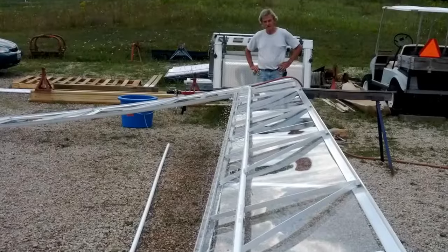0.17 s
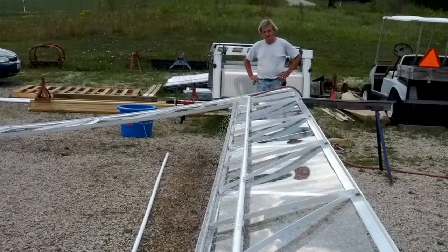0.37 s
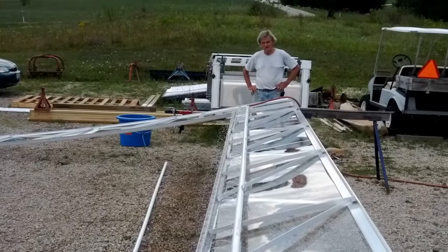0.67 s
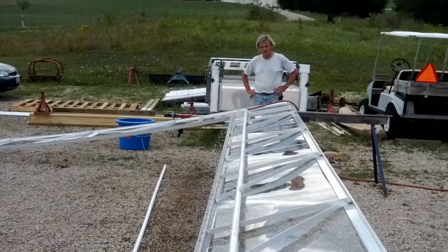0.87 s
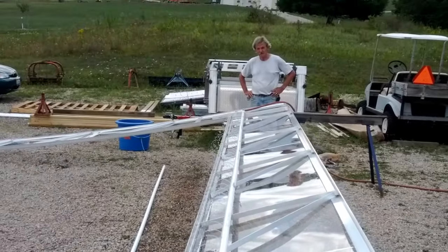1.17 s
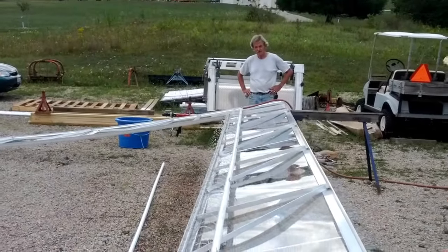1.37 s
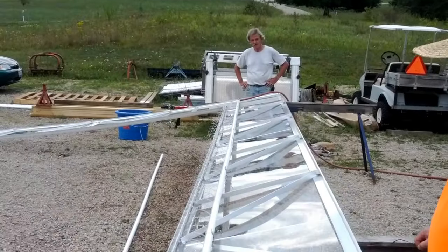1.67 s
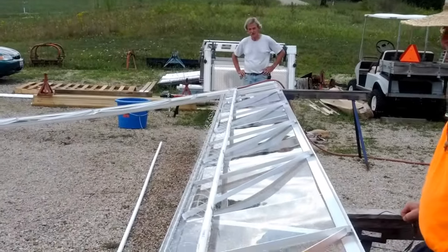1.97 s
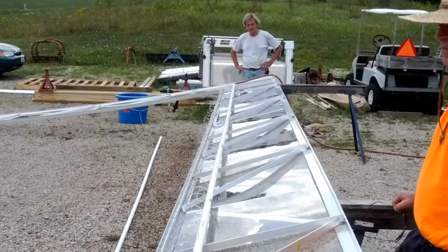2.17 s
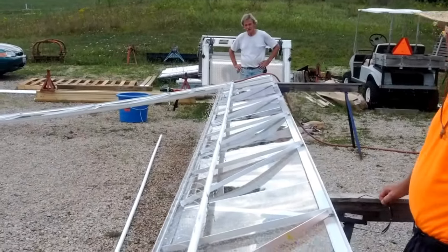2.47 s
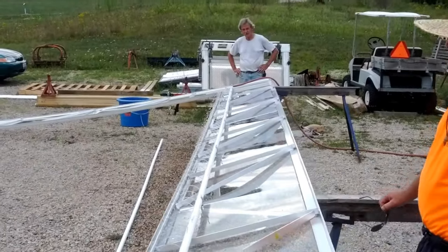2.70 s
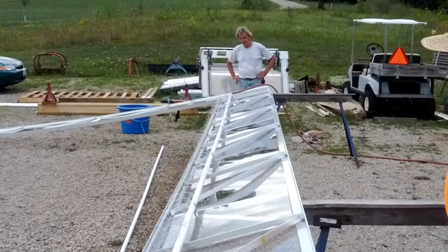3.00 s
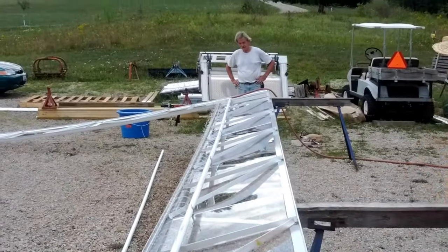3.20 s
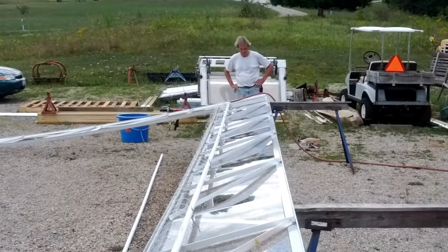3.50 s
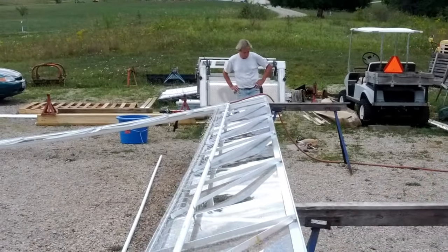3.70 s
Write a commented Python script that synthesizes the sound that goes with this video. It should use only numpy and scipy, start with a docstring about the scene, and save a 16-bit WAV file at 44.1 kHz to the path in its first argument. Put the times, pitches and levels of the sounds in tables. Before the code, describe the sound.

A close, splashy trickle of water runs across plastic sheeting as wind buffets the microphone.

```python
"""Water trickling and spattering close by, as it runs over the plastic film of a roof panel outdoors.
Trapped air rings as short rising bubbles, and drops tick sharply on the film over a fine wash.
The trickle slowly fades while a duller patter fills in beneath it.
Wind buffets the microphone in low thumps and grows to a gust near the end."""
import sys
import numpy as np
from scipy import signal
from scipy.fft import rfft, irfft, next_fast_len
from scipy.io import wavfile
from scipy.ndimage import uniform_filter1d, map_coordinates

SR = 44100
rng = np.random.default_rng(int(sys.argv[2]) if len(sys.argv) > 2 else 0)


def store_wav(level_fs):
    """Save 16-bit WAV to argv[1]."""
    pcm = np.round(np.clip(np.atleast_2d(level_fs), -1, 1) * 32767)
    wavfile.write(sys.argv[1], SR, pcm.T.astype(np.int16))


N = 169785

# Strength of the trickle over the panel. Each row: time in seconds, relative level in dB.
FLOW_DB = [(0, 0), (.9, 0), (1.5, -0.5), (2.1, -1), (2.7, -3), (3.2, -8), (3.85, -4.5)]


def amp(db):
    return 10 ** (np.asarray(db) / 20)


def unit(x):
    return x / np.sqrt(np.mean(x ** 2) + 1e-20)


def curve(rows):
    """One value per sample from (seconds, value) points."""
    return np.interp(np.arange(N) / SR, *np.transpose(rows))


def wobble(per_s):
    """A smooth random curve with per_s knots a second."""
    return map_coordinates(rng.standard_normal(int(N * per_s / SR) + 4), [np.arange(N) * per_s / SR])


def coloured(x, spectrum):
    """x through a causal filter shaped by (Hz, dB) points."""
    m = 2 * next_fast_len(N // 2 + 8192)
    hz, db = np.transpose(spectrum)
    gain_db = np.interp(np.log(np.fft.rfftfreq(m, 1 / SR) + 1), np.log(hz), db)
    cepstrum = irfft(np.log(amp(gain_db)))
    cepstrum[1:m // 2] *= 2  # fold onto positive time for minimum phase
    cepstrum[m // 2 + 1:] = 0
    return irfft(rfft(x, m) * np.exp(rfft(cepstrum)), m)[:N]


def noise(spectrum):
    """Coloured noise of rms 1."""
    return unit(coloured(rng.standard_normal(N), spectrum))


def placed(starts, grains):
    """Sum of the rows of grains, each at its start in seconds."""
    at = np.abs(np.round(starts * SR)).astype(int)[:, None] + np.arange(grains.shape[1])
    return np.bincount(at.ravel(), grains.ravel(), N)[:N]


def shower(per_s, spread_db, clump):
    """Starts in seconds and levels in dB of random events that come in clumps."""
    cumulative = np.cumsum(np.exp(clump * wobble(45)))
    when, strength = rng.random((int(per_s * N / SR), 2)).T
    starts = np.searchsorted(cumulative, when * cumulative[-1]) / SR
    return starts, -spread_db * np.log(strength + 0.0086)


def rings(starts, db, hz, cycles, rise, samples, attack_s=.00028):
    """Sines that die by 60 dB in roughly `cycles`; rise lifts the pitch, as when a bubble surfaces."""
    t = np.arange(samples) / SR
    life = (cycles / hz * np.exp(0.36 * rng.standard_normal(len(hz))))[:, None]
    tone = np.sin(2 * np.pi * hz[:, None] * t * (1 + rise * t / life / 2))
    return placed(starts, tone * amp(db[:, None] - 60 * t / life) * (1 - np.exp(-t / attack_s)))


def splats(starts, db, t60_s, spectrum, samples):
    """Tiny decaying bursts of coloured noise."""
    t = np.arange(samples) / SR
    bursts = rng.standard_normal((len(db), samples)) * amp(db[:, None] - 60 * t / t60_s)
    return coloured(placed(starts, bursts), spectrum)


def glugs(gain_db=.5, start_ratio=.9, rise=.55, attack_s=.0009, churn_hz=260):
    """Each loud bubble opens with a slap and rings as a rising tone, blurred by the splash round it."""
    # The loudest bubbles. Each row: start in seconds, relative level in dB, nominal pitch in Hz,
    # cycles to fall 60 dB, splashiness from 0 to 1.
    loud_bubbles = [(0.1817, -27.5, 1820, 52, 0.3), (0.237, -26, 1840, 44, 0.26),
                    (0.3517, -25, 1670, 50, 0.17), (0.472, -31.5, 1430, 59, 0.2),
                    (0.546, -24, 2540, 32, .7), (0.623, -34, 1370, 52, 0.14), (0.6805, -23, 2040, 65, 0.5),
                    (0.7128, -24.5, 1840, 48, .6), (0.509, -35, 1300, 52, 0.4), (.776, -23.5, 1960, 46, 1),
                    (.985, -29.5, 1920, 54, 0.4), (1.02, -31, 1680, 56, 0.7), (1.227, -34, 1140, 52, 0.3),
                    (1.252, -28, 1300, 60, 0.8), (1.2916, -15, 1330, 15, 0.13),
                    (1.33, -29, 1890, 135, 0.96), (1.5, -29.5, 1490, 57, 0.8),
                    (1.616, -26.5, 2480, 61, 0.3), (1.647, -30.5, 1000, 41, 0), (1.745, -28, 1840, 54, .35),
                    (1.913, -28, 2390, 48, .3), (2.04, -28.5, 1030, 28, 0.1), (2.067, -27, 1090, 16, .4),
                    (2.104, -29, 1073, 41, 0.4), (2.29, -30.5, 1900, 76, 0.8), (2.862, -29, 1240, 23, 0.8),
                    (3.337, -31.5, 1580, 45, 0.3)]
    # Colour of the slap. Each row: frequency in Hz, gain in dB.
    slap_spectrum = [(400, -32), (900, -22), (1900, 2), (2800, -7), (4000, -32), (8000, -6), (16000, -29)]
    starts, db, hz, cycles, splashy = np.transpose(loud_bubbles)[:, :, None]
    t = np.arange(4000) / SR
    life = cycles / hz
    tone = np.exp(2j * np.pi * hz * start_ratio * t * (1 + rise * t / life / 2))
    white = rng.standard_normal((len(starts), len(t), 2)) @ [1, 1j]
    churn = signal.sosfiltfilt(signal.butter(2, churn_hz, fs=SR, output="sos"), white, padtype="even")
    churn = amp(-1.5 - 60 * t / life / 1.2) * churn / churn.std()  # slightly outlasts the clean ring
    envelope = np.sqrt(1 - splashy) * amp(-60 * t / life) + np.sqrt(splashy) * churn
    ringing = amp(db + gain_db) * np.imag(tone * envelope) * (1 - np.exp(-t / attack_s))
    slaps = splats(starts[:, 0], db[:, 0] - 12, t60_s=.012, spectrum=slap_spectrum, samples=1500)
    return placed(starts[:, 0], ringing) + slaps


def ticks(gain_db=7.5, ring_hz=13400, t60_s=.0021, attack_s=.000094):
    """Single drops strike the film with a very short, high ring."""
    # The loudest drops. Each row: start in seconds, relative level in dB.
    loud_drops = [(.228, -12), (.2763, -18), (.4285, -15.5), (0.567, -16), (.8655, -12), (1.0526, -21),
                  (1.556, -22), (1.585, -17), (1.709, -25), (1.734, -12.5), (2.589, -9.5), (3.0157, -17),
                  (3.439, -14.5)]
    starts, db = np.transpose(loud_drops)
    t = np.arange(400) / SR
    hz = ring_hz * np.exp(0.032 * rng.standard_normal((len(starts), 1)))
    envelope = amp(db[:, None] + gain_db - 60 * t / t60_s) * (1 - np.exp(-t / attack_s))
    return placed(starts, envelope * np.sin(2 * np.pi * hz * t))


def splashes(bubbles_each=7, span_s=.012):
    """A lump of water breaks up into a tight burst of small bubbles."""
    # Each row: start in seconds, relative level in dB, middle pitch in Hz.
    bursts = [(.205, -29, 3600), (.413, -27, 3770), (.46, -20.5, 4770), (.646, -28, 4100),
              (.945, -37, 5900), (1.326, -22, 7140), (1.744, -23.5, 5550)]
    starts, db, middle_hz = np.repeat(bursts, bubbles_each, axis=0).T
    late, soft = rng.random((2, len(starts)))
    hz = middle_hz * np.exp(0.184 * rng.standard_normal(len(starts)))
    return rings(starts + span_s * late, db - 4 * late - 6 * soft, hz, cycles=26.5, rise=.033, samples=1200)


def spatter(level_db=-40, ring_hz=13380):
    """Dense droplets, each ringing the film briefly at its own high pitch."""
    starts, db = shower(per_s=900, spread_db=3.6, clump=.33)
    hz = ring_hz * np.exp(0.073 * rng.standard_normal(len(starts)))
    return amp(level_db + curve(FLOW_DB)) * unit(rings(starts, db, hz, cycles=11, rise=0, samples=400))


def wash(level_db=-38.5, patchy_db=4):
    """The sheet of running water hisses, in shifting patches of brightness."""
    # Colour of the hiss. Each row: frequency in Hz, gain in dB.
    spectrum = [(150, -12), (350, -11), (600, -11.5), (900, -2.5), (1400, -11.5), (2200, -4), (3100, -10),
                (3800, -5), (4700, -7), (6400, -2), (7750, -9.5), (9500, -6.5), (10600, -9.5),
                (12200, -0.5), (13400, 2.5), (14800, 1), (16000, -6)]
    hiss = signal.stft(noise(spectrum), nperseg=256)[2]
    patches = uniform_filter1d(rng.standard_normal(hiss.shape), size=6, axis=0)  # smooth across frequency
    patches = uniform_filter1d(patches, size=4, axis=1)  # and across time
    patchy = signal.istft(hiss * amp(patchy_db * unit(patches)), nperseg=256)[1][:N]
    return amp(level_db + 0.83 * curve(FLOW_DB)) * unit(patchy)


def gurgle(level_db=-49.5, low_hz=978, high_hz=2577):
    """Many quiet bubbles chirp upward in the running water."""
    starts, db = shower(per_s=170, spread_db=3.5, clump=.45)
    hz = low_hz * (high_hz / low_hz) ** rng.random(len(starts))
    chirps = rings(starts, db, hz, cycles=44, rise=.6, samples=2500)
    return amp(level_db + .7 * curve(FLOW_DB)) * unit(chirps)


def fizz(ping_db=-49.5, ping_hz=6100, speck_db=-51, speck_hz=9500):
    """Small bubbles ping in the splash and fade faster than the flow; brighter specks lie among them."""
    flow_db = curve(FLOW_DB)
    starts, db = shower(per_s=300, spread_db=4, clump=.45)
    hz = ping_hz * np.exp(0.093 * rng.standard_normal(len(starts)))
    pings = unit(rings(starts, db, hz, cycles=8.3, rise=.13, samples=1000))
    starts, db = shower(per_s=700, spread_db=5, clump=.44)
    hz = speck_hz * np.exp(0.11 * rng.standard_normal(len(starts)))
    specks = unit(rings(starts, db, hz, cycles=11, rise=0, samples=400))
    return amp(ping_db + 5 * flow_db) * pings + amp(speck_db + flow_db) * specks


def patter():
    """Dense, duller drops fill in under the fading trickle."""
    # Growth of the patter. Each row: time in seconds, level in dB.
    growth = [(1.4, -56.5), (2.6, -49.5)]
    # Colour of each drop. Each row: frequency in Hz, gain in dB.
    spectrum = [(600, -10.5), (1200, -6.5), (4300, 0.5), (5600, -11.5), (9500, -2), (16000, -6)]
    starts, db = shower(per_s=700, spread_db=1.5, clump=.35)
    return amp(curve(growth)) * unit(splats(starts, db, t60_s=.0054, spectrum=spectrum, samples=300))


def froth(level_db=-57, lumpy_db=8.5):
    """The broken water churns unevenly round the bubbles."""
    # Colour of the churning. Each row: frequency in Hz, gain in dB.
    spectrum = [(300, -31.5), (600, -3.5), (1100, 3), (1800, 3.5), (2600, -5.5), (4000, -21.5), (8000, -21)]
    return amp(level_db + curve(FLOW_DB)) * unit(amp(lumpy_db * wobble(40)) * noise(spectrum))


def wind(gust_db=-18.5, flutter_growth=2.37, wake_db=-15.5, wake_s=.004):
    """Air on the microphone: low buffeting, single eddies, and higher flutter in gusts and at each eddy."""
    # Strength of the wind. Each row: time in seconds, relative level in dB.
    strength = [(0, -24), (.12, -46.5), (.68, -49), (.87, -31.5), (1.05, -30.5), (1.24, -28.5),
                (1.295, -36), (1.36, -26.5), (1.445, -36), (1.55, -29.5), (1.69, -36), (1.8, -31),
                (2.12, -36.5), (2.42, -23), (2.7, -28.5), (2.81, -25), (3.09, -30), (3.28, -16.5),
                (3.46, -22.5), (3.6, -20.5), (3.85, -27)]
    # Colour of the low buffeting. Each row: frequency in Hz, gain in dB.
    buffet_spectrum = [(10, -13.5), (25, 1.5), (60, -1), (100, -3.5), (160, -11.5), (250, -33.5),
                       (400, -38.5), (800, -42), (2000, -86)]
    # Colour of the flutter. Each row: frequency in Hz, gain in dB.
    flutter_spectrum = [(40, -41), (110, 1.5), (180, 6), (280, -2.5), (420, -11.5), (650, -25),
                        (1200, -41.5), (2500, -84)]
    # Eddies that thump the microphone. Each row: centre in seconds, relative level in dB,
    # pitch in Hz, half length in cycles.
    thumps = [(0.015, -21, 62.6, 0.76), (0.292, -23.5, 66, 0.47), (0.437, -31.5, 74.5, 0.51),
              (0.961, -23, 129, .5), (1.011, -13.5, 144, 0.38), (1.185, -10, 97, 0.3),
              (1.202, -18.5, 129, 0.76), (1.366, -15, 68.5, 0.55), (1.513, -15.5, 125, 0.37),
              (1.739, -20, 75.4, .45), (1.9, -18, 74, 0.25), (2.368, -16.5, 96, 0.29),
              (2.447, -17.5, 140, 0.73), (2.514, -14.5, 84.5, 0.68), (2.851, -12.5, 58.4, 0.49),
              (3.2669, -3, 187, 0.43), (3.289, -16.5, 198, .6), (3.31, -6.5, 156, 0.61),
              (3.352, -15, 80, 0.91), (3.415, -4.5, 230, 0.23), (3.428, -6.5, 333, 0.57),
              (3.512, -8, 170, 0.4), (3.564, -7.5, 69, 0.73), (3.693, -14.5, 287, 0.37)]
    level_db = curve(strength)
    buffet = amp(level_db + 1.5 + 1.3 * wobble(22.48)) * noise(buffet_spectrum)
    centres, db, hz, cycles = np.transpose(thumps)[:, :, None]
    t = np.arange(N) / SR - centres
    eddies = amp(db + .5) * np.sin(2 * np.pi * t * hz) * np.exp(-(t * hz / cycles) ** 2 / 2)
    wakes = amp(db + wake_db) * np.exp(-(t / wake_s) ** 2)
    # The flutter grows faster than the buffeting as the wind nears gust level.
    gusts = amp(gust_db - 2 + flutter_growth * (level_db - gust_db) + 2.6 * wobble(45))
    flutter = (gusts + wakes.sum(0)) * noise(flutter_spectrum)
    return buffet + eddies.sum(0) + flutter


def scene(surge_db=1.3, swell_db=.6):
    """Water and wind at one microphone by the panel; all the fine spray surges together with the stream."""
    surge = amp(surge_db * wobble(110) + swell_db * wobble(12))
    spray = surge * (fizz() + spatter() + patter() + wash())
    return (glugs() + splashes() + gurgle() + froth() + ticks() + spray + wind())[None]


def record(dry, overload=.9, top_hz=15900):
    """The microphone rounds off the hardest buffets; nothing above the band limit is kept."""
    rounded = dry / (1 + (dry / overload) ** 4) ** .25
    m = next_fast_len(N + 8192)
    in_band = np.fft.rfftfreq(m, 1 / SR) < top_hz
    return irfft(rfft(rounded, m) * in_band, m)[:, :N]


dry = scene()
out = record(dry)
store_wav(out)
```